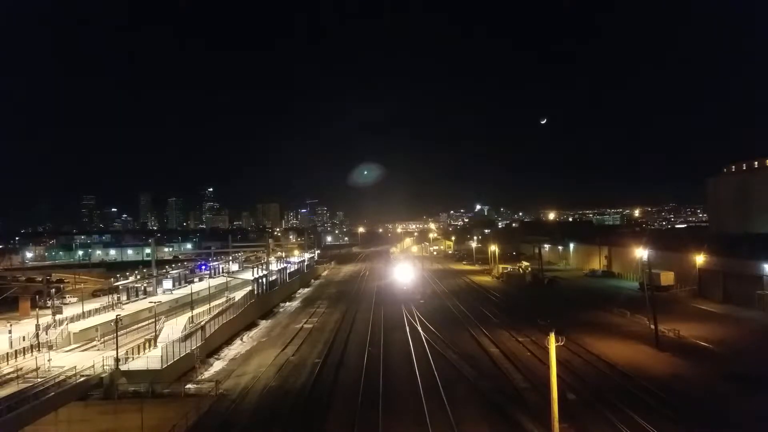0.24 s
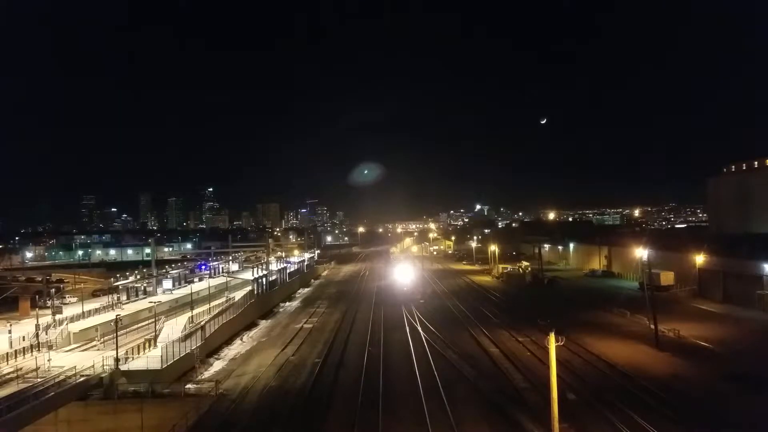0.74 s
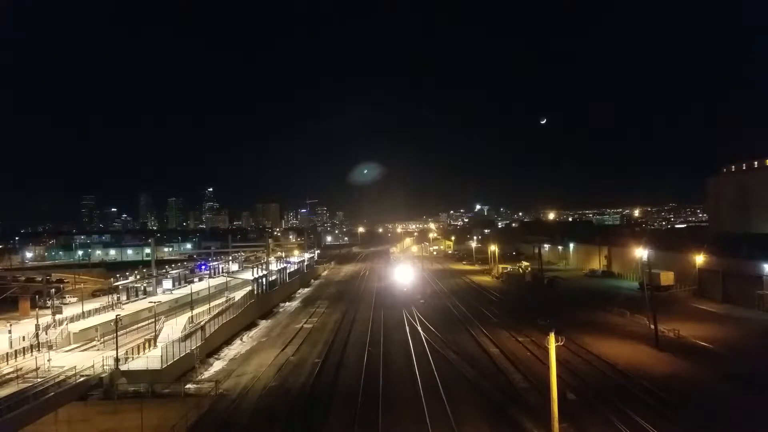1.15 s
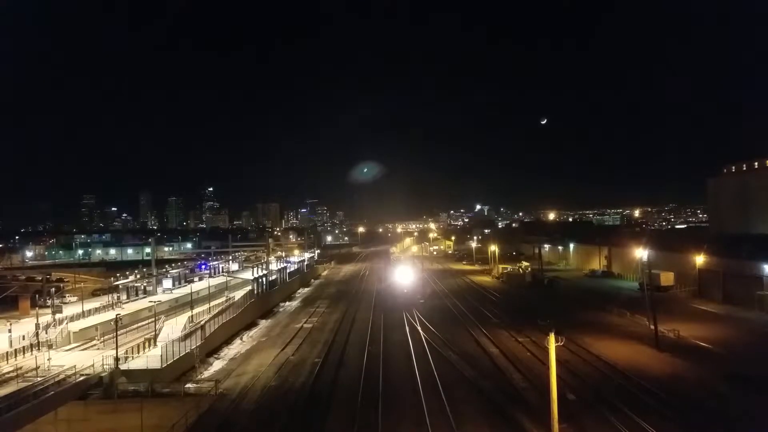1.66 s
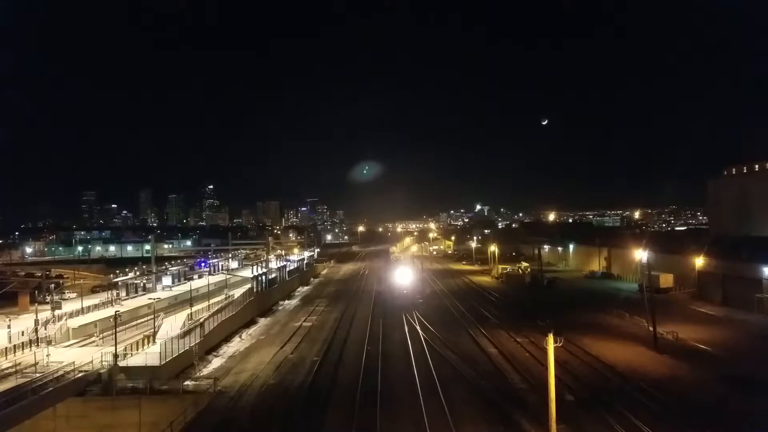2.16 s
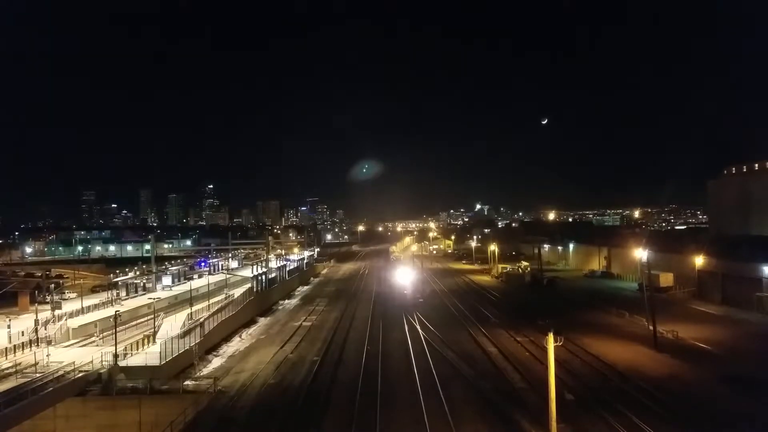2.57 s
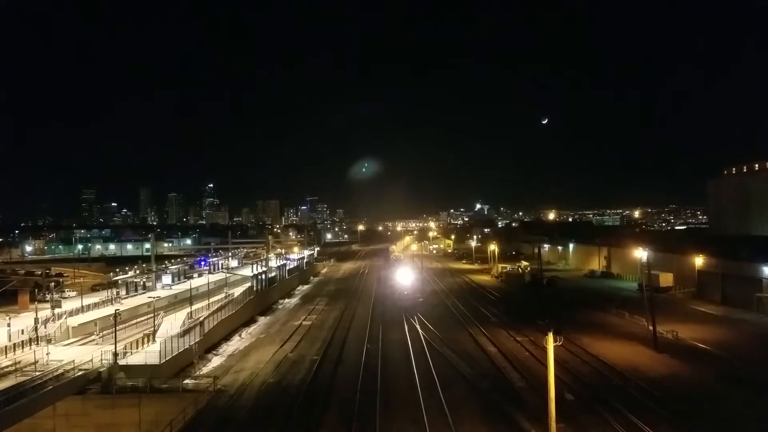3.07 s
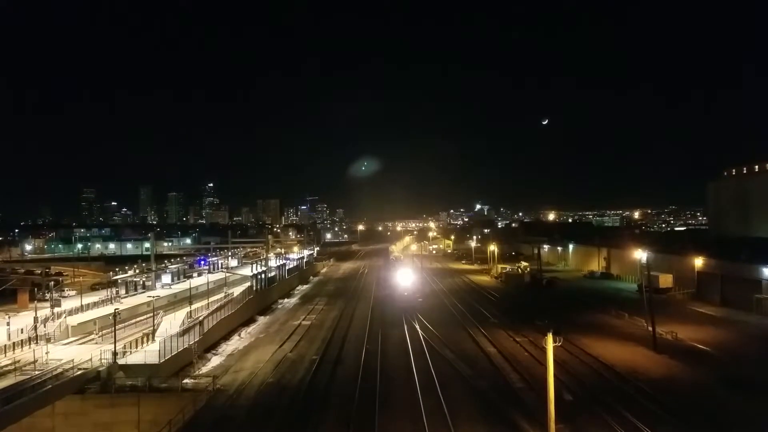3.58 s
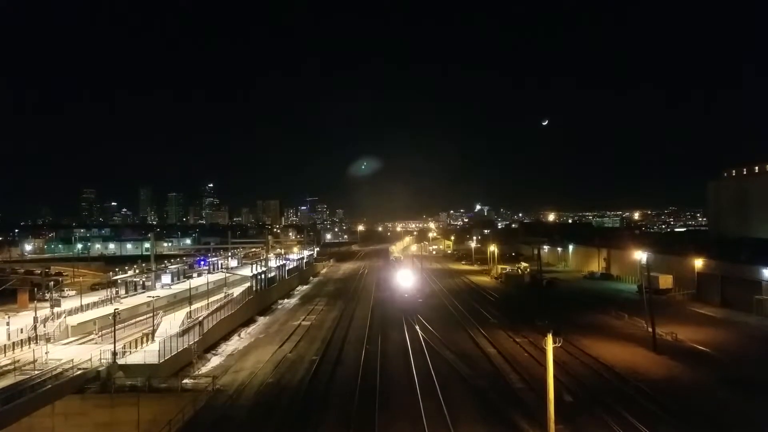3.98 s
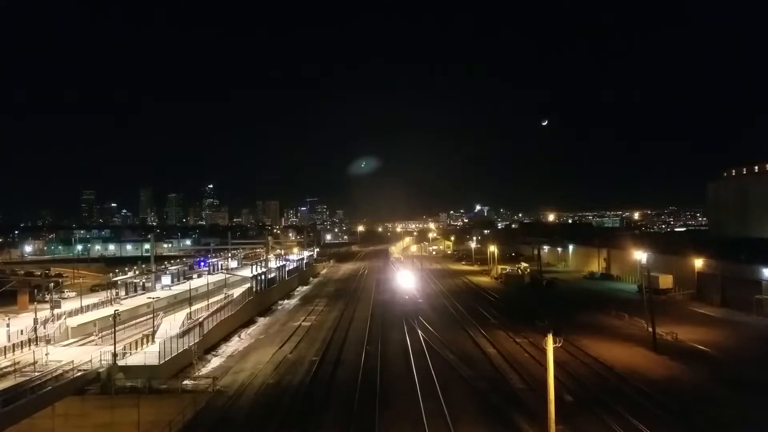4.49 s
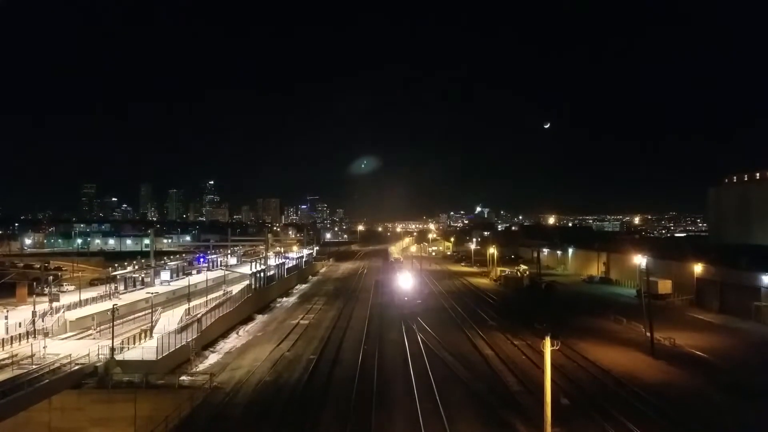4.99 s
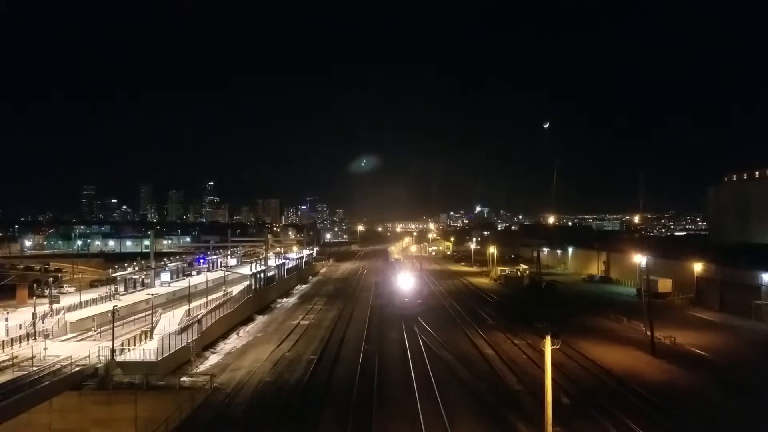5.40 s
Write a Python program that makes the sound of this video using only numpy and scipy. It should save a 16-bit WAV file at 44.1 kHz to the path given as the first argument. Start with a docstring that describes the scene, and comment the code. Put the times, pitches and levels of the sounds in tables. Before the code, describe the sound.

Low throbbing diesel rumble of a slowly approaching freight train over hollow city wash, with cloth brushes and small ticks close to the microphone.

```python
"""A rail yard at night, ahead of a bridge, as a freight train creeps nearer over the wash of the city.
Two diesel engines turn at nearly the same slow speed: sums of shaft-speed lines throb and beat, deep firing
notes swell, and shaped noise roars. Whines and a far hum are thin smeared tones; a car's tyre hiss fades as noise.
Close to the microphones a sleeve brushes as bursts of noise and ticks as short coloured snaps."""
import sys
import numpy as np
from scipy import signal
from scipy.fft import rfft, irfft
from scipy.io import wavfile

SR = 44100
rng = np.random.default_rng(int(sys.argv[2]) if len(sys.argv) > 2 else 0)


def persist_wave(psi):
    """Save psi, clipped to +-1, as 16-bit WAV."""
    counts = np.round(np.clip(psi, -1, 1) * 32767).astype(np.int16)
    wavfile.write(sys.argv[1], SR, np.atleast_2d(counts).T)


N = 248715
TIME = np.arange(N) / SR
BINS = np.fft.rfftfreq(N, 1 / SR)

# likeness of the two microphones for far sound: frequency_hz, correlation (-1 to 1)
MIC_LIKENESS = [(130, 0.84), (290, 0.94), (400, 0.77), (550, 0.47), (780, 0.48), (1000, -0.079),
                (1230, -0.23), (1600, -0.024), (3000, -0.052)]
# brushes of the sleeve: peak_s, length_s, left_db, right_db (gains on the cloth spectra), firmness (0-1)
SLEEVE_BRUSHES = [(1.42, .16, -8, -0.5, .6), (1.58, .23, -13, -6.5, 0.4), (1.737, .18, -4.5, -14, 0.3),
                  (3.208, 0.31, -2, -15, 0.06), (4.002, 0.34, -10, -25, 0.13), (4.75, 0.28, 1, -9, 0.05),
                  (4.92, 0.22, -5, -11, .2), (5.072, 0.28, 2, -2.5, 0.07)]


def gain_of(db):
    """Turns decibels into an amplitude factor."""
    return 10 ** (np.asarray(db) / 20)


def evened(x):
    """Scales a signal to an rms of one."""
    return x / np.sqrt(np.mean(abs(x) ** 2) + 1e-30)


def curve(rows):
    """Joins (s, value) points by straight lines in time."""
    return np.interp(TIME, *np.transpose(rows))


def read(rows, hz):
    """Reads each column of a spectrum table on a log-frequency axis."""
    table_hz, *columns = np.transpose(rows)
    return np.array([np.interp(np.log(hz + 1), np.log(table_hz + 1), column) for column in columns])


def slow(rate_hz):
    """Complex random wander of rms one, no faster than about the given rate."""
    t = np.arange(0, 8, 1 / 200)
    wander = rng.standard_normal((len(t), 2)) @ [1, 1j]
    lowpass = np.exp(-.5 * (np.fft.fftfreq(len(t), t[1]) / rate_hz) ** 2)
    wander = np.fft.ifft(np.fft.fft(wander) * lowpass)
    return evened(np.interp(TIME, t, wander))


def at_two_mics(a, b, likeness):
    """Mixes two independent signals into a left and right pair with the given correlation."""
    return np.array([a, likeness * a + np.sqrt(1 - likeness ** 2) * b])


def noise(spectrum):
    """Noise of a given density (dB per Hz) at two microphones, alike in the bass, unlike in the treble."""
    a, b = rfft(rng.standard_normal((2, N)))
    pair = at_two_mics(a, b, read(MIC_LIKENESS, BINS)[0])
    return irfft(pair * gain_of(read(spectrum, BINS)), N) * np.sqrt(SR / 2)


def tones(rows):
    """Thin tones, smeared by their way through the air; high ones reach the two microphones unalike."""
    out = np.zeros((2, N))
    for hz, width_hz, *sides_db in rows:
        a, b = slow(width_hz / 2), slow(width_hz / 2)
        paths = at_two_mics(a, b, read(MIC_LIKENESS, hz)[0])
        tone = (paths * np.exp(2j * np.pi * hz * TIME)).real
        out += np.sqrt(2) * gain_of(sides_db)[:, None] * tone
    return out


def yard(waver_db=0.5, waver_hz=8.1):
    """The far wash wavers a little, a car's tyre noise peaks and recedes, and a thin hiss holds steady."""
    # rolling wheels and the city, before the wash level: frequency_hz, left_db_per_hz, right_db_per_hz
    wash_spectrum = [(150, -77, -73.5), (496, -62.5, -67), (617, -69.5, -66.5), (720, -62.5, -63.5),
                     (1126, -64.5, -67), (1244, -67.5, -73.5), (1492, -70.5, -68.5), (1772, -81, -78),
                     (2400, -87, -83), (3080, -92, -85), (4040, -100, -99), (4900, -106, -101),
                     (6160, -110, -111), (9500, -128, -128)]
    # tyres of a car driving away, before its rise and fade: frequency_hz, left_db_per_hz, right_db_per_hz
    tyre_spectrum = [(300, -81.5, -64.5), (770, -77, -71.5), (1010, -60, -63.5), (1500, -71.5, -79.5),
                     (1920, -82, -72), (2420, -80.5, -78.5), (3160, -89.5, -77), (4020, -91.5, -88),
                     (5000, -99, -94), (6200, -100, -100), (7500, -103, -105), (9500, -119, -113),
                     (15000, -124, -122)]
    # thin steady hiss: frequency_hz, left_db_per_hz, right_db_per_hz
    hiss_spectrum = [(4000, -126, -126), (7000, -116, -119), (7560, -114, -116), (8200, -109, -109),
                     (8700, -120, -120), (9900, -119, -119), (11500, -114.5, -115), (15000, -110.5, -111)]
    wash_db = 0.27
    car_peak_s, car_db, rise_db_per_s, fade_db_per_s = .25, -.5, 3, 16.5

    wash = noise(wash_spectrum) * gain_of(wash_db + waver_db * slow(waver_hz).real)
    since_s = TIME - car_peak_s
    # the lower line holds: rising before the peak, falling after it
    car_level_db = car_db + np.minimum(rise_db_per_s * since_s, -fade_db_per_s * since_s)
    return wash + noise(tyre_spectrum) * gain_of(car_level_db) + noise(hiss_spectrum)


def far_hum():
    """A deep hum from the far side of the yard, one narrow smeared tone."""
    # the hum: frequency_hz, width_hz, left_db, right_db (rms)
    hum = [(47.6, 2.5, -47.5, -45)]
    return tones(hum)


def sleeve(grain_db=0.8, catch_db=6.0):
    """Each brush builds and stops; a light one hisses with the weave, a firm one catches and scrapes."""
    # cloth sliding by the microphones, before brush gains: frequency_hz, left_db_per_hz, right_db_per_hz
    cloth = [(1200, -100, -100), (2000, -95, -87.5), (3000, -90.5, -88.5), (3970, -89.5, -92),
             (5000, -99.5, -92.5), (6200, -92, -99.5), (7550, -89, -99), (8340, -98.5, -95),
             (9300, -101, -101), (11500, -95, -99), (15500, -94, -93.5)]
    # a firm brush scrapes lower, before brush gains: frequency_hz, level_db_per_hz
    scrape_spectrum = [(800, -98), (1600, -71.5), (2900, -74.5), (3800, -95.5), (5000, -90.5), (7500, -99),
                       (10000, -110), (15000, -108)]
    build_share, flank_steepness = 0.62, 2.24  # a brush builds more slowly than it stops

    light_power, firm_power = np.zeros((2, 2, N))
    for peak_s, length_s, *sides_db, firmness in SLEEVE_BRUSHES:
        flank_s = length_s * np.where(TIME < peak_s, build_share, 1 - build_share)
        swell = np.exp(-abs(1.72 * (TIME - peak_s) / flank_s) ** flank_steepness)
        power = gain_of(sides_db)[:, None] ** 2 * swell
        light_power += (1 - firmness) * power
        firm_power += firmness * power
    hiss = noise(cloth) * np.sqrt(light_power) * gain_of(grain_db * slow(50).real)
    scrape = noise(scrape_spectrum) * np.sqrt(firm_power)
    return hiss + scrape * evened(gain_of(catch_db * slow(70).real))


def ticks(rows, chatter_db=-10, chatter_s=0.0042, size=1024):
    """Each tick is one sharp snap, then a few milliseconds of weaker chatter, coloured dull to crisp."""
    # colour of a dull tick and of a crisp one: frequency_hz, dull_db, crisp_db
    tick_colour = [(800, -26, -30), (2500, 10, -14), (4760, 11, -5), (6500, -0.5, -9.5), (8200, -8.5, -3),
                   (9500, -15, -4.5), (12000, -15, 2), (15500, -8.5, 3)]
    out, t = np.zeros((2, N + 2 * size)), np.arange(size) / SR
    dull_db, crisp_db = read(tick_colour, np.fft.rfftfreq(2 * size, 1 / SR))
    for snap_s, left_db, right_db, dullness in rows:
        burst = gain_of(chatter_db) * np.exp(-t / chatter_s) * rng.standard_normal((2, size))
        burst[:, 0] = 3.4  # the snap
        colour = gain_of(crisp_db + dullness * (dull_db - crisp_db))
        # silence ahead leaves room for the zero-phase colouring
        padded = np.pad(burst, ((0, 0), (size, 0)))
        tick = irfft(rfft(padded) * colour)
        start = round(snap_s * SR) - size
        out[:, start:start + 2 * size] += gain_of([[left_db], [right_db]]) * tick
    return out[:, :N]


def faint_ticks(count=40, softest_db=-60, range_db=12, left_drop_db=6):
    """Creases of cloth let go at random: rows of snap_s, left_db, right_db, dullness (0-1)."""
    when, size, side, dull = rng.random((count, 4)).T
    db = softest_db + range_db * size ** 2
    return np.transpose([0.093 + 5 * when, db - left_drop_db * side, db, .5 * dull])


def catches(count=8, softest_db=-57, range_db=8, left_drop_db=6, spread=.6, dullness=.8):
    """Brushes, mostly the firmest, snag on the weave: rows of snap_s, left_db, right_db, dullness (0-1)."""
    pick, when, size = rng.random((count, 3)).T
    peak_s, length_s, _, _, firmness = np.transpose(SLEEVE_BRUSHES)
    odds = np.cumsum(firmness ** 2)
    brush = np.searchsorted(odds, pick * odds[-1])
    snap_s = peak_s[brush] + spread * length_s[brush] * (when - .5)
    db = softest_db + range_db * size
    return np.transpose([snap_s, db - left_drop_db, db, np.full(count, dullness)])


def handling():
    """The sleeve close to the microphones: sliding cloth, clear ticks, faint ticks and snags."""
    # the clearest ticks: snap_s, left_db, right_db (gains on the tick colour), dullness (0-1)
    clear_ticks = [(.277, -51, -40, 0.8), (.338, -52, -46, 0.2), (.806, -45, -34, 0.6),
                   (.945, -45, -60, .2), (1.081, -45, -43, .2), (1.432, -49, -42, .9),
                   (1.525, -50, -39, .5), (1.771, -45, -32.5, .4), (2.092, -54, -42.5, 0),
                   (2.861, -47, -46, 0.2), (3.228, -41, -38, 0), (3.561, -49, -58, 0),
                   (4.939, -42, -43, .1), (5.125, -48, -36, 0.2), (5.382, -41, -24.5, 0.61),
                   (5.458, -55, -39, 0.5), (5.587, -49, -34.5, 0.6)]
    return sleeve() + ticks(clear_ticks) + ticks(faint_ticks()) + ticks(catches())


def whines():
    """The faint turbocharger and gear whines, steady pitches smeared by the air."""
    # the whines: frequency_hz, width_hz, left_db, right_db (rms)
    whine_tones = [(970, 6, -51.5, -56), (1940, 6, -72, -69), (2730, 10, -75, -69.5), (2781, 6, -70, -63.5)]
    return tones(whine_tones)


def exhaust(turns, orders, direct_db, fade_hz):
    """Unequal cylinders give lines at multiples of shaft speed; strong ones hold, weak ones fade in echoes."""
    out = np.zeros(N)
    for order, db in orders:
        scattered = np.clip((direct_db - db) / 8, .15, 1)
        path = evened(np.sqrt(1 - scattered ** 2) + scattered * slow(fade_hz))
        line = (path * np.exp(2j * np.pi * order * turns)).real
        out += np.sqrt(2) * gain_of(db) * line
    return out


def firing_note(turns, db, puffs_per_turn=8):
    """The deep note of the exhaust puffs, evenly spaced round each turn."""
    return -np.sqrt(2) * gain_of(db) * np.cos(2 * np.pi * puffs_per_turn * turns)


def locomotives():
    """Two engines whose firing notes beat about twice a second, and a roar that pulses with each turn."""
    # lead engine's lines, before approach and balance: order (multiple of crankshaft speed), level_db (rms)
    lead_orders = [(7, -51), (9, -41), (11, -47), (14, -48), (15, -49), (17, -47), (18, -45), (19, -34.5),
                   (20, -35), (22, -48), (23, -48), (24, -45)]
    # rear engine's lines, before rear_level and balance: order (multiple of crankshaft speed), level_db (rms)
    rear_orders = [(7, -50), (9, -50), (10, -47), (17, -46), (19, -46), (20, -48), (21, -47), (22, -47),
                   (23, -52), (24, -44), (25, -40), (26, -46), (27, -52), (32, -48), (39, -52), (40, -48),
                   (48, -54)]
    # how strongly the rear engine's lines come through: time_s, gain_db
    rear_level = [(0, -0.5), (1, -1), (1.6, 3.5), (2.3, -1), (4.5, -3), (5.3, 2), (5.64, -3.5)]
    # swell of the lead engine's firing note, before balance: time_s, level_db (rms)
    lead_firing = [(0, -40.5), (.9, -46), (1.5, -32.5), (2.7, -29.5), (3.27, -36), (4.3, -29), (5.64, -28)]
    # turbulent roar of the exhaust, before approach and balance: frequency_hz, level_db_per_hz
    roar_spectrum = [(15, -103), (31, -95), (39, -70.5), (47, -63), (58, -63.5), (80, -60), (110, -59.5),
                     (140, -58.5), (190, -56.5), (235, -54.5), (300, -58), (370, -59.5), (420, -66.5),
                     (600, -72), (1200, -120.5)]
    lead_turns_per_s, rear_turns_per_s = 9.644, 9.368
    in_step_s = 4.3375  # a moment when the two engines fire in step
    far_db, approach_db_per_s = -0.69, 0.3843
    rear_firing_db, rear_firing_db_per_s = -48.5, 2  # at the start, and its steady growth

    lead_turns = lead_turns_per_s * (TIME - in_step_s)
    rear_turns = rear_turns_per_s * (TIME - in_step_s)
    near = gain_of(far_db + approach_db_per_s * TIME)
    # neighbouring strong lines beat once a turn: the chugging
    lines = near * exhaust(lead_turns, lead_orders, direct_db=-39, fade_hz=.6)
    lines += gain_of(curve(rear_level)) * exhaust(rear_turns, rear_orders, direct_db=-37, fade_hz=.8)
    firing = firing_note(lead_turns, curve(lead_firing))
    firing = firing + firing_note(rear_turns, rear_firing_db + rear_firing_db_per_s * TIME)
    roar = noise(roar_spectrum) * near * (1 + 0.022 * np.cos(2 * np.pi * lead_turns))
    # balance in dB, left then right: all lean a little to the right
    out = firing * gain_of([[-1.5], [1.2]])
    out = out + lines * gain_of([[-1.1], [.9]])
    return out + roar * gain_of([[-.5], [.4]])


def scene():
    """The yard behind, small handling sounds close by, and the train ahead."""
    return yard() + far_hum() + handling() + whines() + locomotives()


def record(dry, edge_hz=15900):
    """The recorder's band limit, a steep low-pass."""
    lowpass = signal.firwin(511, edge_hz, window=("kaiser", 9), fs=SR)
    return signal.oaconvolve(dry, lowpass[None], "same")


dry = scene()
out = record(dry)
persist_wave(out)
```